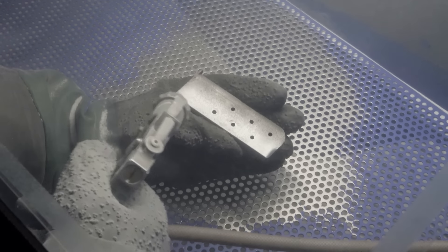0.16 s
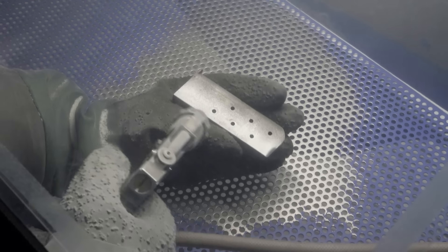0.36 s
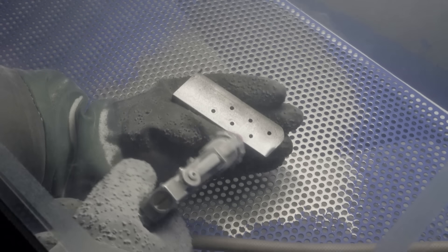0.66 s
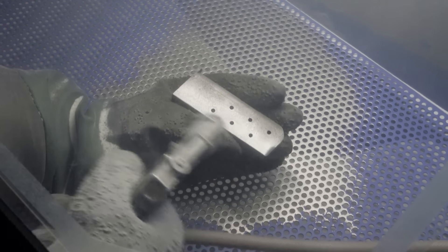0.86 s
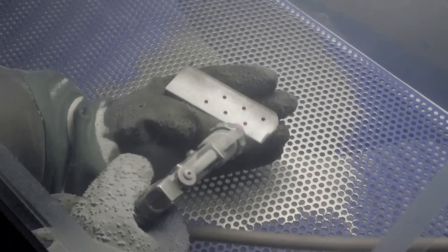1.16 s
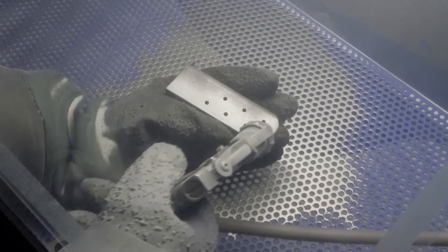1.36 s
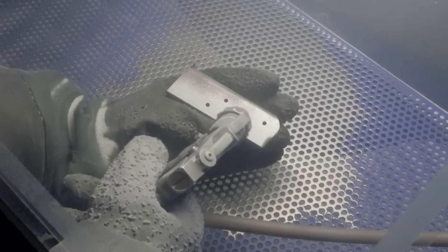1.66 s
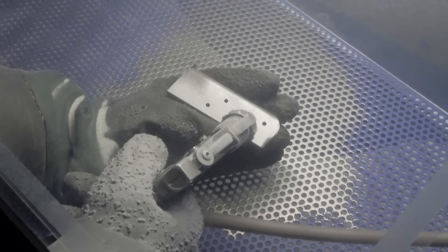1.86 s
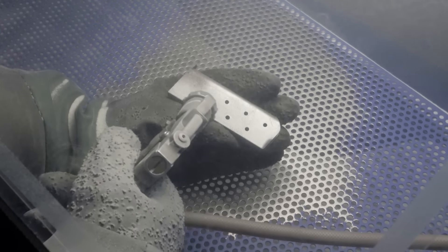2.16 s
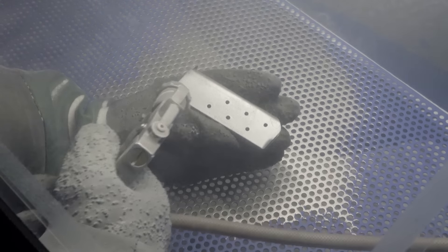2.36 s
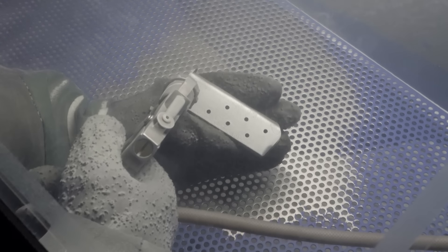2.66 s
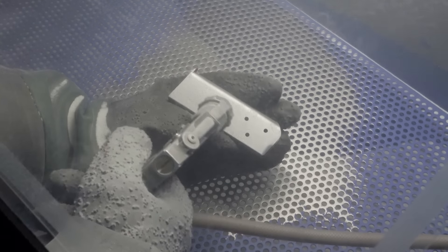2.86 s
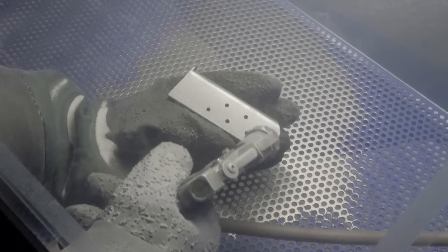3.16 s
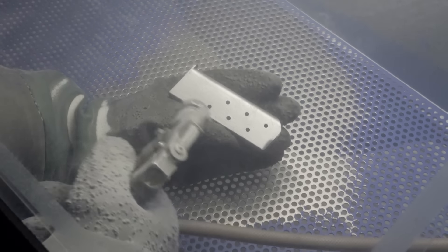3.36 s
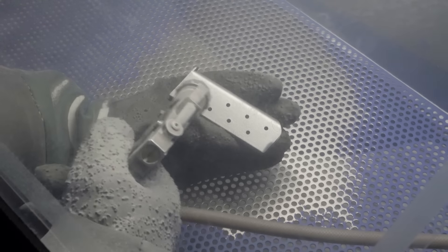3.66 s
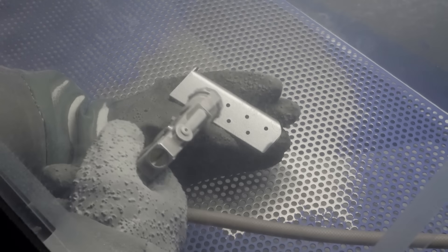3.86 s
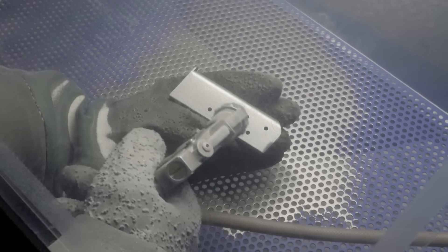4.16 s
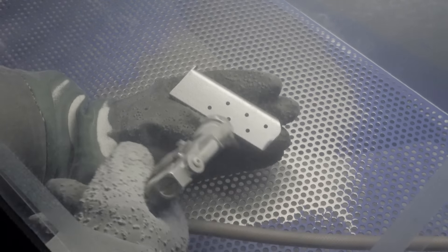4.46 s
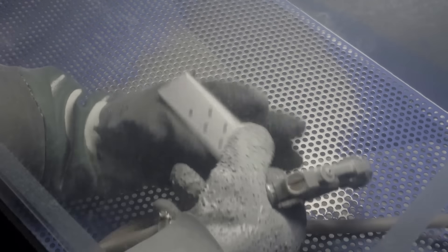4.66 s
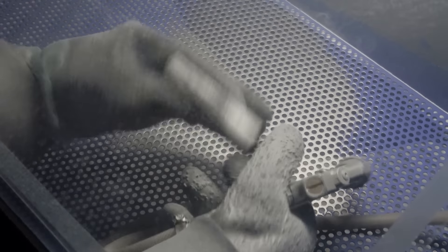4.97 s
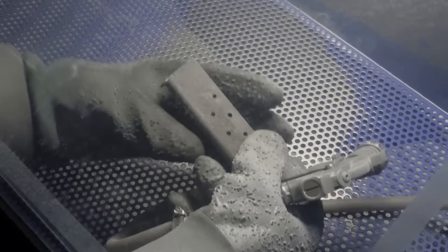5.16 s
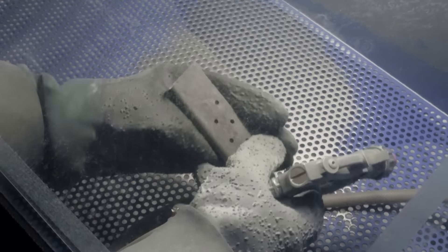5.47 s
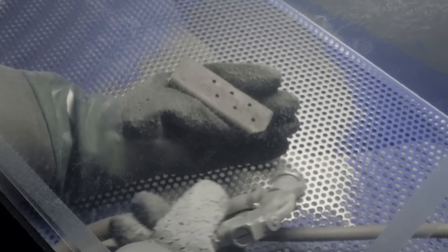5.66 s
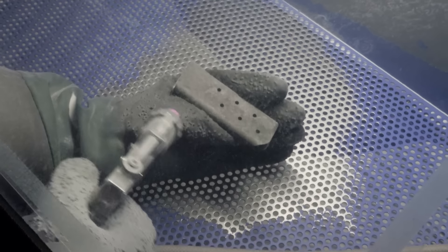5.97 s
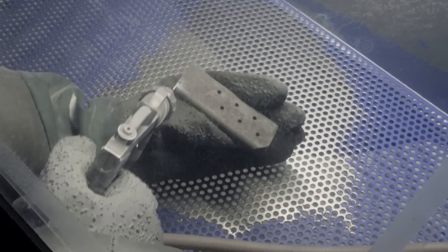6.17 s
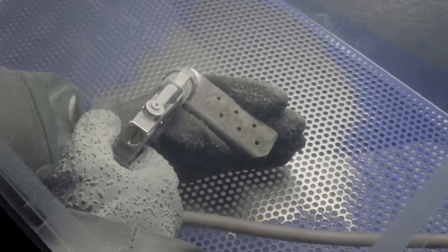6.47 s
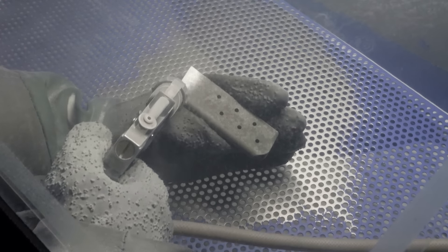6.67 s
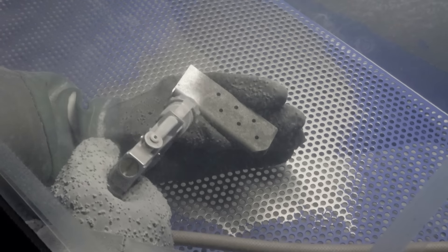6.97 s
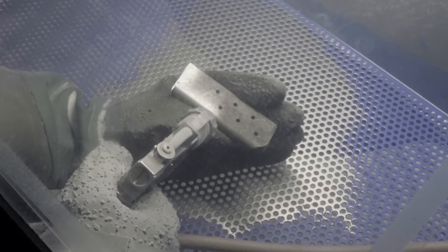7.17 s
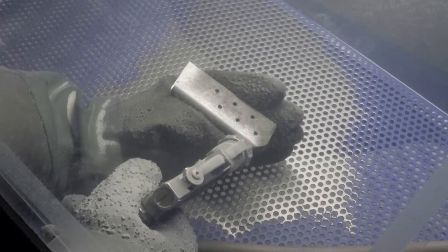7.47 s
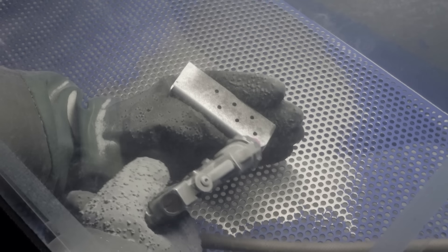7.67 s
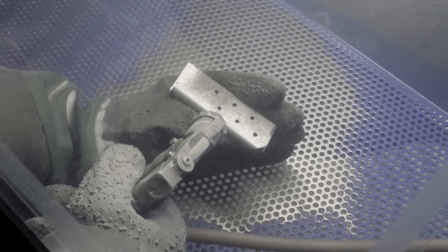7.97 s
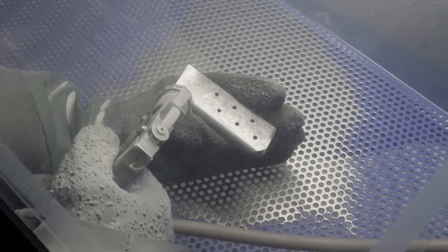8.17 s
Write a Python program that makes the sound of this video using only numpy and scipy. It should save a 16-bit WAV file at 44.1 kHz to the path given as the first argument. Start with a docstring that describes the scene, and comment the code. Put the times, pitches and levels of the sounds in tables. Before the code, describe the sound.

Dense, bright pressurised hiss, coloured by hollow box resonances, fluttering slightly as the nozzle sweeps metal. A steady extractor whine sits within it, leaping up in pitch soon after the start. Midway, a rasping shudder and quick knocks speed up into a rough, continuous compressor buzz with rushing intake air, briefly dragging the whine down. Close stereo perspective at the cabinet, mostly centred with wider treble.

```python
"""Bead blasting in a closed cabinet

Heard at the cabinet in stereo: glass beads hit a small steel part, a jet of noise hissing in the box's resonances.
A fast turbine, probably the dust extractor, whines as a few harmonics; hiss and whine change abruptly early on.
Halfway a piston compressor starts with a thump of resonant noise and its strokes speed up into a hard buzz.
It pulls the whine's pitch down sharply for a moment, then leaves it slightly lower and quieter."""
import sys
import numpy as np
from scipy import signal
from scipy.fft import rfft, irfft
from scipy.io import wavfile
from scipy.ndimage import uniform_filter1d

SR = 44100
rng = np.random.default_rng(int(sys.argv[2]) if len(sys.argv) > 2 else 0)


def dump(signal):
    """Clip the signal to [-1, 1] and save it as 16-bit WAV at the path in sys.argv[1]."""
    limited = np.clip(np.atleast_2d(signal).T, -1, 1)
    pcm = np.round(limited * 32767).astype(np.int16)
    wavfile.write(sys.argv[1], SR, pcm)


N = 366912
TIME = np.arange(N) / SR
FREQ = np.maximum(np.fft.rfftfreq(N, 1 / SR), 1)
RUNNING_HZ = 82.64  # compressor strokes per second at full speed

# unlikeness of the two channels: pitch_hz, side_re_mid_db
STEREO_WIDTH = [(100, -42), (300, -57), (700, -44), (1400, -41), (2800, -22.5), (5600, -17.5), (10000, -16),
                (14000, -11.5)]
# dips and small lifts from reflections between the cabinet walls: pitch_hz, half_width_hz, change_db
WALL_REFLECTIONS = [(2040, 41, -4), (2640, 80, -2.5), (3650, 120, -2.5), (4220, 60, 0), (5250, 140, -5),
                    (7950, 110, 1.5), (8550, 200, 0), (10830, 300, -1.5), (12650, 150, 1),
                    (14600, 220, -3.5)]


def undb(db):
    """Decibels to gain."""
    return 10 ** (np.asarray(db) / 20)


def curves(table):
    """Each column of a time table, sample by sample."""
    s, *columns = np.transpose(table)
    return [np.interp(TIME, s, c) for c in columns]


def colour(points, hz):
    """Gain of a (Hz, dB) spectrum at the given frequencies, interpolated over log frequency."""
    f, db = np.transpose(points)
    return undb(np.interp(np.log(hz), np.log(f), db))


def walk(rate):
    """Random levels held for 1 / rate seconds, smoothed twice and scaled to a spread of 1."""
    hold = int(SR / rate)
    held = np.repeat(rng.standard_normal(N // hold + 1), hold)
    smooth = uniform_filter1d(uniform_filter1d(held, hold), hold)[:N]
    return smooth / smooth.std()


def after_change(change_s=0.639, fade_s=0.00302):
    """0 before the abrupt change of hiss and whine, 1 after it."""
    return np.clip((TIME - change_s) / fade_s, 0, 1)


def motor(start_s=4.11, switch_s=0.02, run_up_s=0.165):
    """The compressor motor: whether it is on (0-1), and its speed (0-1), which rises in an S-curve."""
    age = np.maximum(TIME - start_s, 0)
    on = 1 - np.exp(-age / switch_s)
    speed = np.tanh((age / run_up_s) ** 2)  # about three quarters of full speed after run_up_s
    return on, speed


def rush(slope, modes, reflections=()):
    """Turbulent air: a broad hiss with resonances standing out of it, shaped by wall reflections."""
    power = colour(slope, FREQ) ** 2
    for hz, width, db in modes:
        power = power + undb(db) ** 2 / (1 + (1.39 * (FREQ - hz) / width) ** 2) ** 2
    gain = np.sqrt(power * SR / 2)
    for hz, half_width, db in reflections:
        gain = gain * undb(db * np.exp(-((FREQ - hz) / half_width) ** 2))
    # countless weak high modes of the box ripple the treble
    grid = np.arange(0, SR / 2, 30)
    ripple = np.interp(FREQ, grid, rng.standard_normal(len(grid)))
    ripple_db = 1.4 * ripple * np.minimum(FREQ / 5000, 1)
    mid, side = rfft(rng.standard_normal((2, N))) * gain * undb(ripple_db)
    side = side * colour(STEREO_WIDTH, FREQ)
    return irfft(np.array([mid + side, mid - side]), N)


def two_ports(sound, t60=0.1):
    """Short reflections off the steel walls reach left and right differently, most of all in the treble."""
    t = TIME[:SR // 10]
    walls = rng.standard_normal(len(t)) * undb(-60 * t / t60)
    echo = signal.fftconvolve(sound, walls / np.linalg.norm(walls))[:N]
    side = irfft(rfft(echo) * colour(STEREO_WIDTH, FREQ), N)
    return np.array([sound + side, sound - side])


def pan(sound, db, above_hz=1800):
    """Lean the treble to the left by so many dB (right if negative); the bass keeps its place."""
    lean_db = db / (1 + (above_hz / FREQ) ** 4)
    return irfft(rfft(sound) * undb(np.array([lean_db, -lean_db]) / 2), N)


def jet(sizzle_hz=11100, sizzle_width_hz=1500, flutter_db=0.37, opening_db=0.3, jet_db=0.26):
    """The blast hiss; its top sizzles more or less as the beads find the part, and the feed flutters."""
    # hiss before and after the change, ahead of the trims: pitch_hz, density_db_per_hz
    opening_hiss = [(30, -134.6), (80, -133.1), (130, -111.9), (200, -111.9), (400, -95), (600, -83),
                    (900, -88), (1500, -84.5), (3000, -84.6), (7000, -88.4), (11000, -86.5), (14000, -84.0),
                    (15600, -87.8)]
    jet_hiss = [(30, -140.9), (60, -134.6), (90, -122.5), (140, -134.4), (220, -123.7), (400, -107.5),
                (650, -100.8), (1000, -81), (1250, -94.5), (2200, -88.5), (5000, -87), (11000, -89.5),
                (13000, -87), (15600, -87.5)]
    # resonances in each hiss, ahead of the trims: pitch_hz, width_hz, density_db_per_hz
    opening_modes = [(413, 14, -91.1), (500, 24, -79.5), (528, 23, -73.5), (650, 22, -78),
                     (1100, 120, -81.5), (1490, 81, -83), (2369, 32, -88), (2782, 170, -76.5),
                     (3470, 57, -77.5), (4050, 140, -77.5), (4612, 378, -84), (5800, 129, -81.1),
                     (6260, 62, -80.5), (7240, 187, -86.5), (7776, 466, -85.5), (8601, 422, -83.5),
                     (9478, 205, -84), (10000, 287, -86)]
    jet_modes = [(202, 14, -110.4), (250, 20, -114.8), (540, 31, -99.6), (668, 28, -93), (767, 29, -85.5),
                 (819, 28, -75), (867, 39, -79), (1308, 23, -88.5), (1436, 76, -88.5), (1630, 94, -87),
                 (1800, 130, -82.5), (2203, 54, -87.5), (2350, 73, -83), (2530, 85, -84), (2780, 38, -86),
                 (3106, 130, -86), (3332, 74, -87), (3770, 24, -80), (4356, 177, -79.5), (4640, 150, -83.5),
                 (5470, 99, -81), (6453, 215, -80.5), (6960, 92, -86), (7420, 89, -83.5),
                 (9370, 270, -84.5), (10160, 200, -86), (11330, 100, -85.5), (15072, 341, -89.5)]
    # sizzle as the nozzle sweeps the part: time_s, level_db
    sizzle_levels = [(0.66, -56), (1.13, -53), (1.15, -62), (1.36, -52), (1.4, -56), (1.79, -54),
                     (1.87, -60), (1.98, -52), (2.32, -59.5), (3.02, -55.5), (3.87, -56.5), (4.06, -52),
                     (4.17, -57), (4.32, -56), (5.02, -52.5), (8.3, -53.5)]
    plain_db = -55.5  # sizzle level at which the hiss keeps its plain colour
    loaded_db = -0.7  # the jet weakens a little while the compressor runs

    sizzle_db, = curves(sizzle_levels)
    changed = after_change()
    _, speed = motor()
    blast = rush(jet_hiss, jet_modes, WALL_REFLECTIONS)
    sizzle_band = np.exp(-(2 * (FREQ - sizzle_hz) / sizzle_width_hz) ** 2)
    sizzle = irfft(rfft(blast) * sizzle_band, N)
    blast = blast + (undb(sizzle_db - plain_db) - 1) * sizzle
    opening = undb(opening_db) * (1 - changed) * rush(opening_hiss, opening_modes)
    hiss = opening + undb(jet_db) * changed * blast
    return hiss * undb(loaded_db * speed + flutter_db * walk(14))


def turbine(wander=0.000503, waver_db=1.06, overtone_waver_db=2.0, inrush_power=9):
    """Blade whine with a few overtones; it sags as the compressor draws current, and the air stream shakes it."""
    # lower overtones of the whine: multiple, level_re_fundamental_db
    overtones = [(2, -10), (3, -9.5)]
    # thin whistle on the seventh harmonic: time_s, level_db
    whistle = [(0.3, -62), (1.1, -57), (1.6, -65), (3.9, -63), (4.2, -60), (5.9, -61), (6.3, -70),
               (7.7, -71), (8.05, -61)]
    opening_blade_hz, blade_hz = 1200.5, 1910.5  # blade rate before and after the change
    opening_db, later_db, loaded_db = -52, -53.5, -9  # before, after, and the drop under load
    start_sag_hz, run_sag_hz = 128, 23.5  # blade rate lost to the starting and the running current
    lag_s = 0.055  # the rotor's inertia smooths the sag

    changed = after_change()
    on, speed = motor()
    # the starting current stays high until the motor is nearly up to speed
    inrush = 1 - speed ** inrush_power
    load_hz = on * (run_sag_hz + (start_sag_hz - run_sag_hz) * inrush)
    keep = np.exp(-1 / (lag_s * SR))
    sag_hz = signal.lfilter([1 - keep], [1, -keep], load_hz)
    hz = opening_blade_hz * (1 - changed) + blade_hz * changed - sag_hz
    level_db = opening_db * (1 - changed) + later_db * changed + loaded_db * (1 - inrush)
    phase = 2 * np.pi * np.cumsum(hz * (1 + wander * walk(25))) / SR
    whine = undb(level_db + waver_db * walk(35)) * np.sin(phase)
    for multiple, db in overtones:
        whine += undb(level_db + db + overtone_waver_db * walk(20)) * np.sin(multiple * phase)
    seventh_db, = curves(whistle)
    whine += undb(seventh_db + overtone_waver_db * walk(20)) * np.sin(7 * phase)
    return np.sqrt(2) * whine  # levels are RMS


def stroke(buzz_db=-54.0):
    """One stroke: a sharp suction snap, then a fading rattle of reflections that lasts until the next."""
    # harmonics of the stroke rate, relative to buzz_db: multiple, level_db
    buzz = [(1, -49), (2, -23), (3, -21), (4, -6.5), (5, -11), (6, -10.5), (7, -12), (8, -6.5), (9, -9),
            (10, -8.5), (11, 0), (12, -21), (13, -15), (14, -8), (15, -1), (16, -8), (17, -12.5), (18, 0),
            (19, -14), (20, -1), (21, -0.5), (22, -3.5), (23, -6), (24, -5.5), (25, -10), (26, -5.5),
            (27, -6.5), (28, -4), (29, -15), (30, -6), (31, -13), (32, -26), (33, -8), (34, -3), (35, -4),
            (36, -2), (37, -7)]
    # thinner treble above them, relative to buzz_db: pitch_hz, level_db
    buzz_treble = [(3150, -19.5), (3900, -8.5), (4450, -12.5), (4750, -11.5), (5100, -16.5), (5900, -12),
                   (6500, -21.5), (7800, -25), (8300, -22), (9000, -25), (10000, -26), (11100, -25),
                   (12300, -19), (13500, -33)]

    order, db = np.transpose(buzz)
    size = round(SR / RUNNING_HZ)
    k = np.arange(1, size // 2 + 1)
    hz = k * RUNNING_HZ
    treble = colour(buzz_treble, hz) * undb(3 * rng.standard_normal(len(k)))
    gain = np.where(k <= order.max(), undb(np.interp(k, order, db)), treble)
    t = TIME[:size]
    rattle = rng.standard_normal(size) * (t > .001) * np.exp(-t / .02)
    # the snap comes through most directly in the middle range
    snap = np.interp(hz, [500, 800, 1400, 2000, 3500], [.5, 2.2, 2.2, .7, .5])
    paths = snap + rfft(rattle / np.linalg.norm(rattle))[1:]
    # snap and rattle set only the phases; the tables set the levels
    spectrum = np.r_[0, gain * paths / np.abs(paths)]
    wave = irfft(spectrum, size) * size / np.sqrt(2)
    return -undb(buzz_db) * np.roll(wave, SR // 1000)


def compressor(uneven_db=.5, puff=0.13, air_db=0.35, low_cut_hz=130, knock_hz=1350, knock_width_hz=1100):
    """Piston strokes speed up from a dull knocking to a bright buzz; air rushes in with a small puff on each."""
    # air rushing through, ahead of air_db: pitch_hz, density_db_per_hz
    intake_hiss = [(30, -133.4), (70, -122.4), (120, -119.5), (200, -113.4), (350, -109.7), (600, -104.0),
                   (800, -91), (1300, -93.5), (2200, -89), (4000, -90), (7000, -91), (11000, -91),
                   (13500, -88.5), (15600, -97.3)]
    # its resonances, ahead of air_db: pitch_hz, width_hz, density_db_per_hz
    intake_modes = [(248, 22, -96), (309, 14, -94), (368, 26, -95.5), (485, 58, -94), (845, 14, -70.5),
                    (1035, 25, -79.5), (1282, 29, -81), (1476, 54, -88), (1712, 46, -79.5), (2690, 25, -74),
                    (3150, 230, -86), (3755, 16, -74.5), (5930, 182, -90), (8267, 165, -89)]
    crank_turns = 0.62  # where the crank stood, as a share of a turn
    stroke_power, air_power = 0.66, 2.1  # strokes and air flow grow as these powers of the speed
    first_air = undb(-6)  # air that flows as soon as the motor is on
    knock_db = -0.5

    on, speed = motor()
    turns = crank_turns + np.cumsum(RUNNING_HZ * speed) / SR
    # one stroke per whole turn, a few microseconds early or late
    at = np.interp(np.arange(1, int(turns[-1]) + 1), turns, np.arange(N))
    chance = rng.standard_normal((len(at), 2))
    at = at + 5e-6 * SR * chance[:, 0]
    # sinc taps place each pulse between samples
    taps = at.astype(int)[:, None] + np.arange(-8, 9)
    strengths = undb(uneven_db * chance[:, 1:])
    pulses = np.zeros(N)
    np.add.at(pulses, np.clip(taps, 0, N - 1), np.sinc(taps - at[:, None]) * strengths)
    pulses = pulses * speed ** stroke_power
    # slow strokes only knock; rattle, bass and treble come with speed
    knock_band = np.exp(-(2 * (FREQ - knock_hz) / knock_width_hz) ** 2)
    knock = -undb(knock_db) * irfft(rfft(pulses) * knock_band, N)
    full = speed ** 3
    buzz = full * signal.fftconvolve(pulses, stroke())[:N]
    buzz = buzz + np.sqrt(np.maximum(1 - full, 0)) * knock
    # the small housing radiates no deep bass
    buzz = signal.sosfilt(signal.butter(4, low_cut_hz, "high", fs=SR, output="sos"), buzz)
    air = rush(intake_hiss, intake_modes, WALL_REFLECTIONS) * (1 + puff * np.cos(2 * np.pi * turns))
    flow = on * first_air + (1 - first_air) * speed ** air_power
    return two_ports(buzz) + air * flow * undb(air_db)


def jolt(rise_s=0.014):
    """The compressor's frame shudders and rasps in a few resonances as the motor kicks in."""
    # shudders, each level the start of its decay: start_s, pitch_hz, width_hz, level_db, t60_s
    shudders = [(4.112, 228, 60, -55, 0.31), (4.12, 436, 160, -59, 0.33), (4.13, 1560, 500, -44.5, 0.43),
                (4.175, 1320, 300, -47.5, 0.38), (4.2, 1780, 160, -40, 0.19), (4.285, 1100, 500, -51, 0.55)]
    out = np.zeros(N)
    for s, hz, width, db, t60 in shudders:
        age = np.maximum(TIME - s, 0)
        band = 1 / (1 + (2 * (FREQ - hz) / width) ** 4)
        shudder = irfft(rfft(rng.standard_normal(N)) * band, N)
        rise = 1 - np.exp(-(age / rise_s) ** 2)
        out += rise * undb(db - 60 * age / t60) * shudder / shudder.std()
    return out


def scene(jet_pan_db=-0.6, compressor_pan_db=1.85):
    """Jet, turbine and compressor, heard together at the cabinet."""
    return pan(jet(), jet_pan_db) + pan(compressor(), compressor_pan_db) + two_ports(turbine() + jolt())


def record(dry, top_hz=15750):
    """The recorder cuts the top steeply."""
    return signal.sosfilt(signal.ellip(12, .1, 70, top_hz, fs=SR, output="sos"), dry)


dry = scene()
out = record(dry)
dump(out)
```